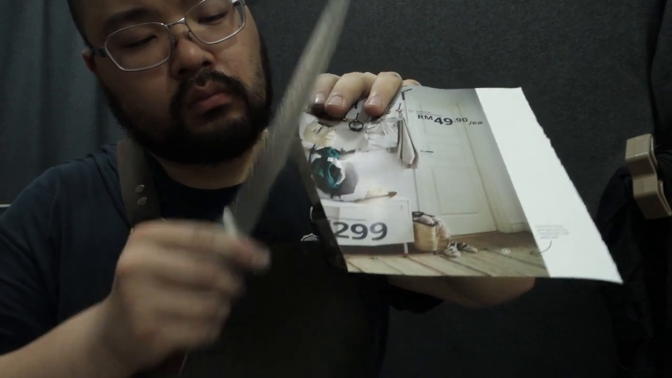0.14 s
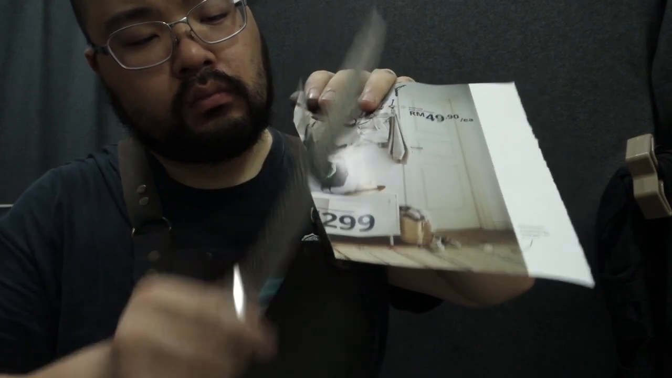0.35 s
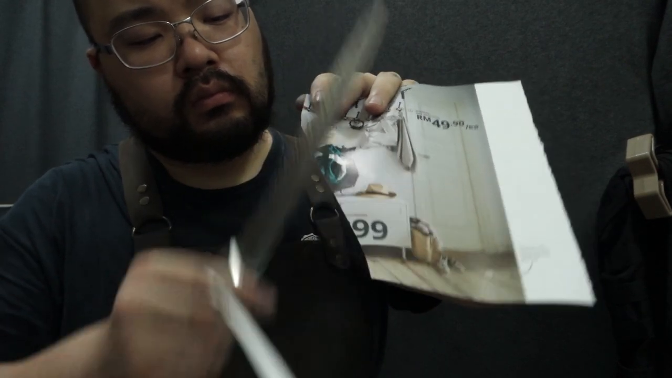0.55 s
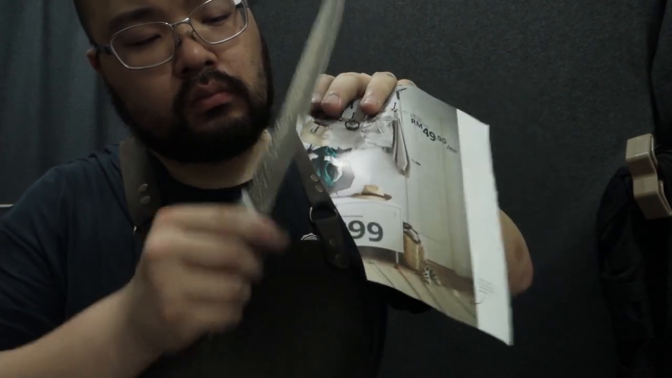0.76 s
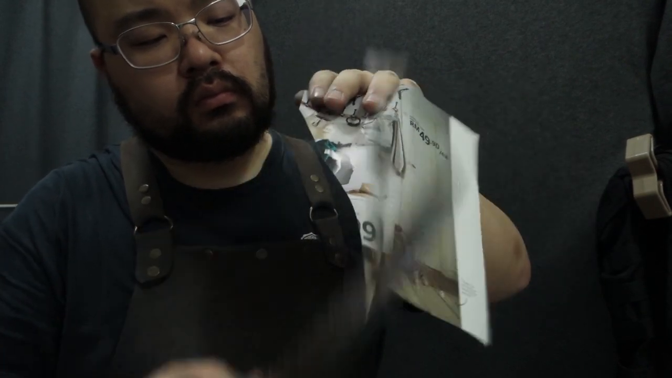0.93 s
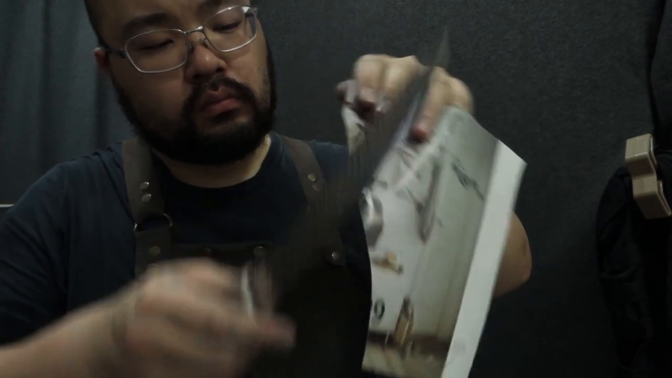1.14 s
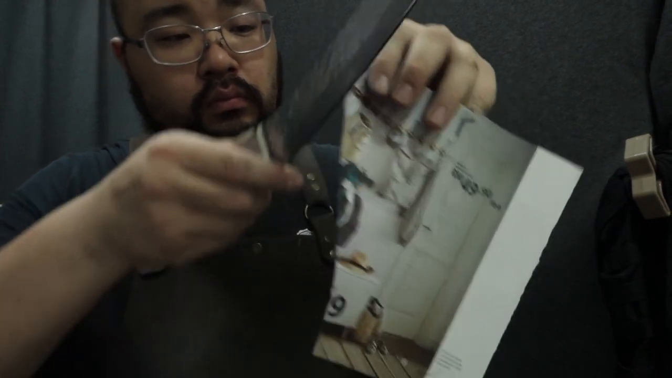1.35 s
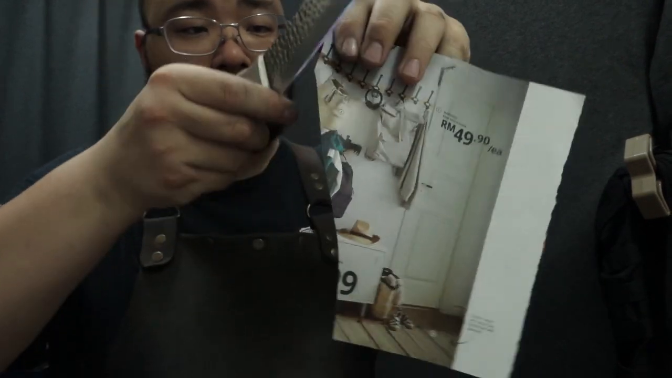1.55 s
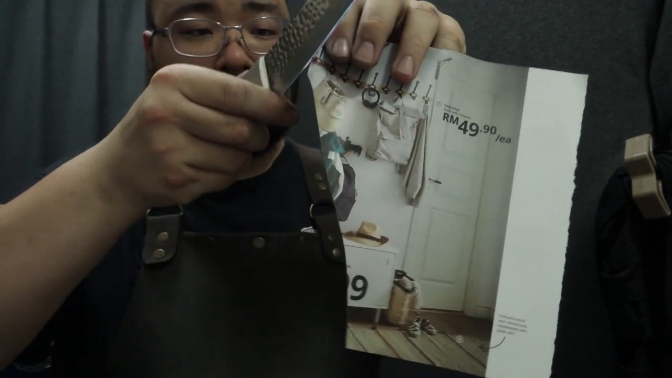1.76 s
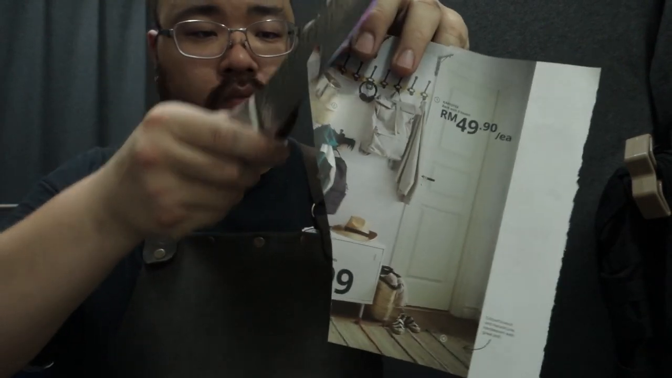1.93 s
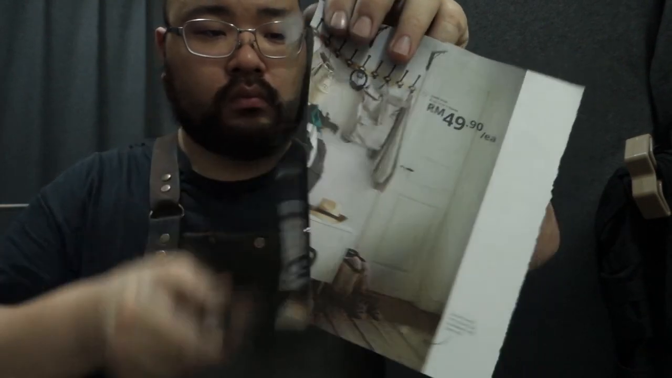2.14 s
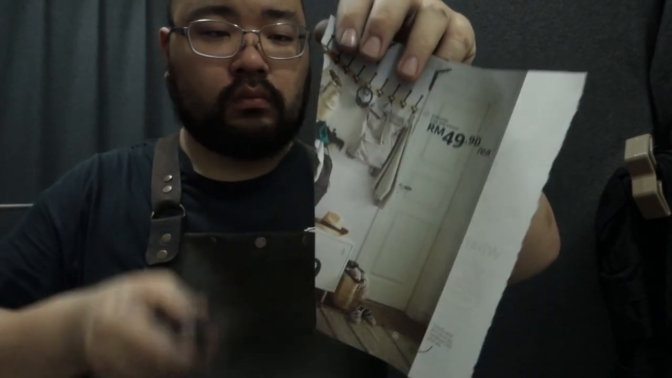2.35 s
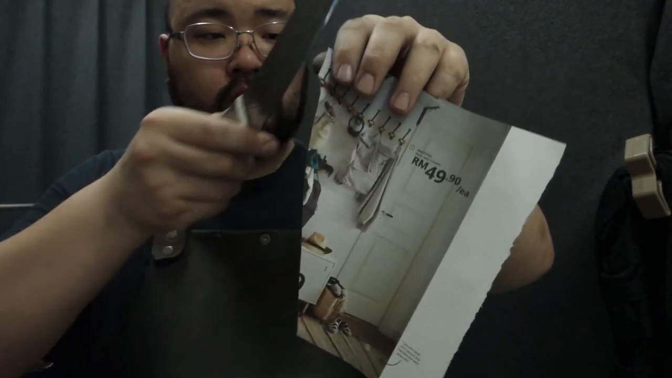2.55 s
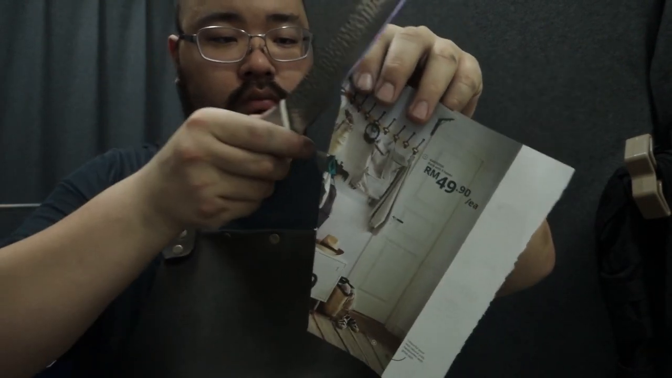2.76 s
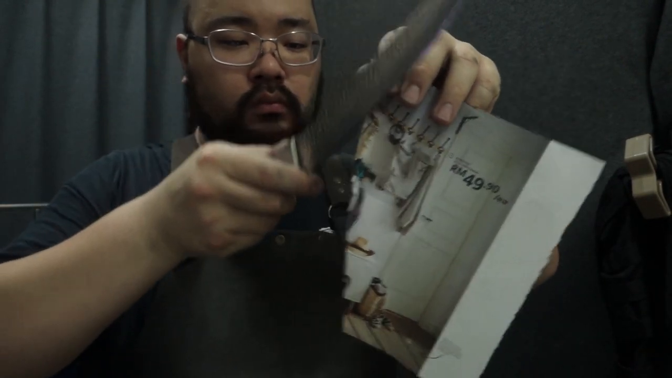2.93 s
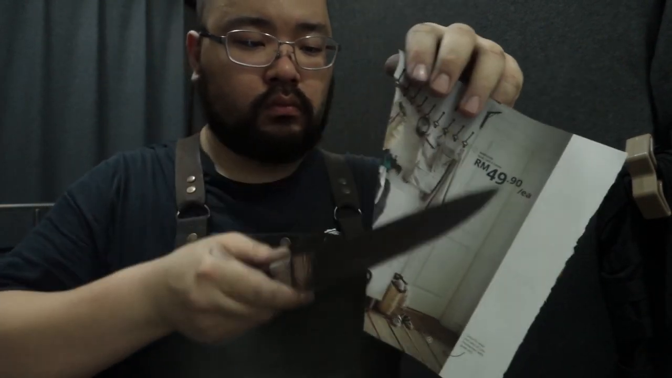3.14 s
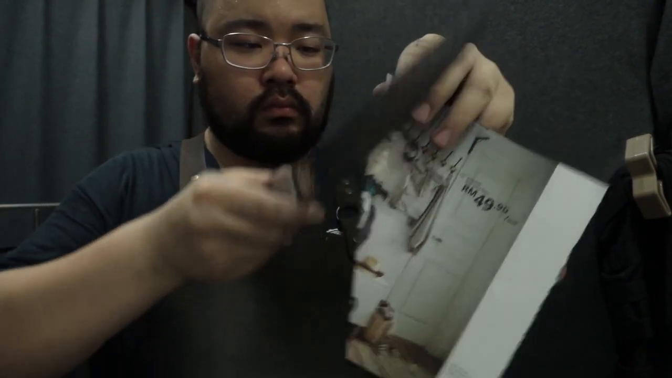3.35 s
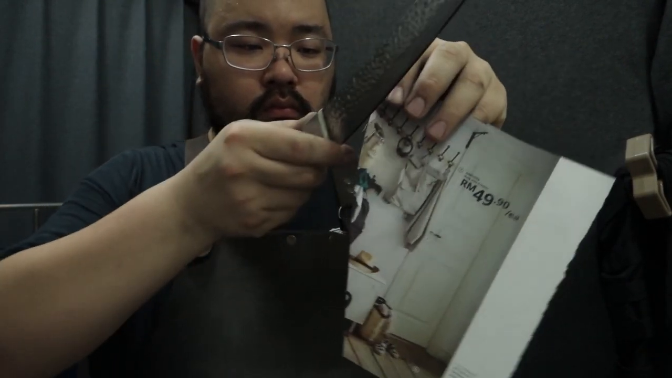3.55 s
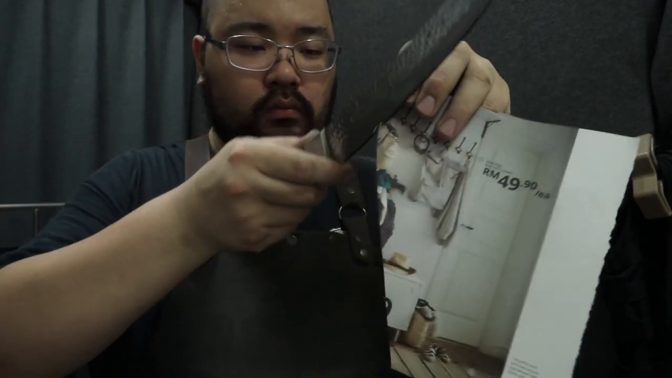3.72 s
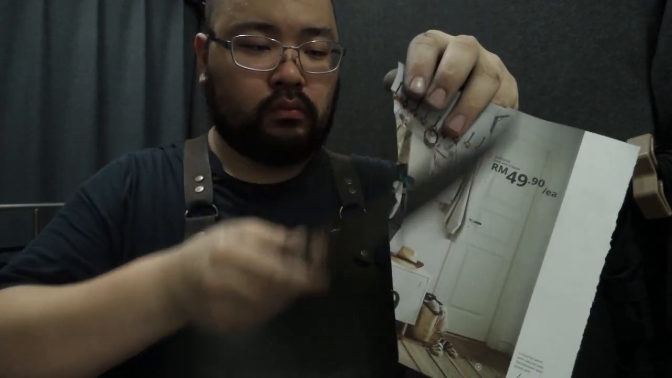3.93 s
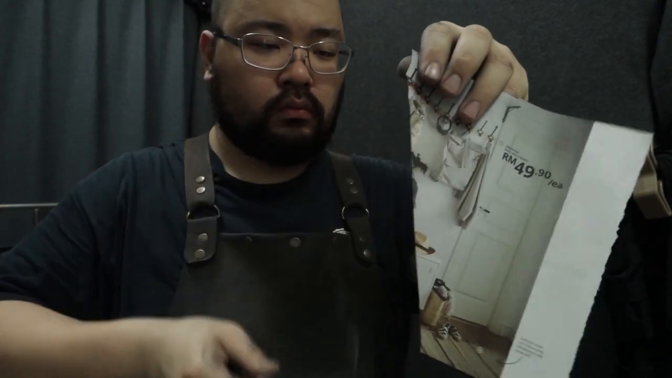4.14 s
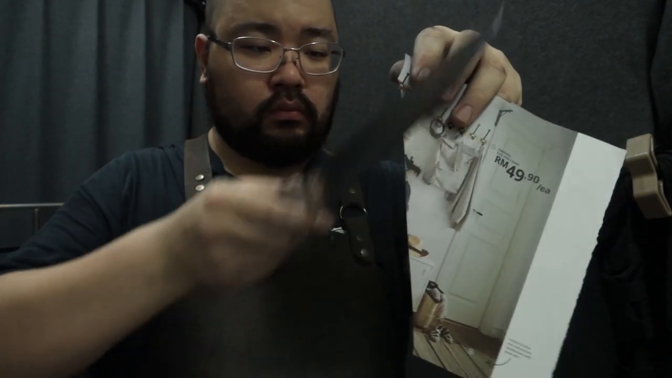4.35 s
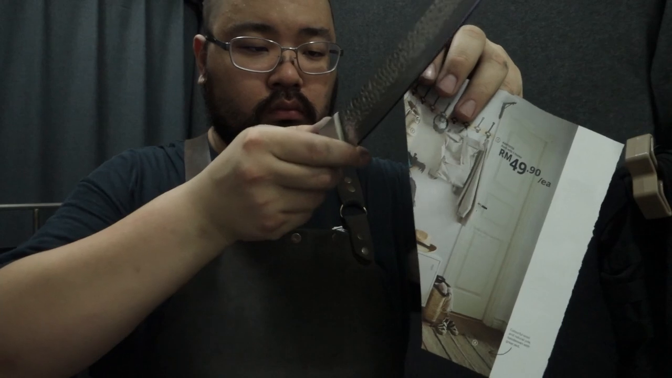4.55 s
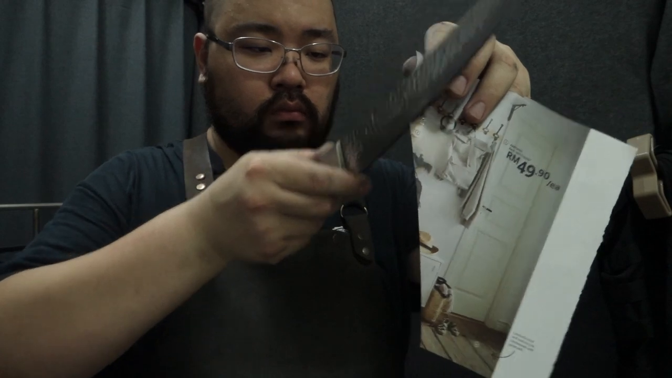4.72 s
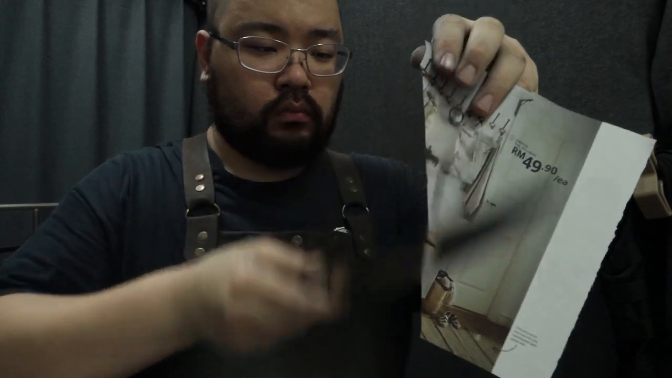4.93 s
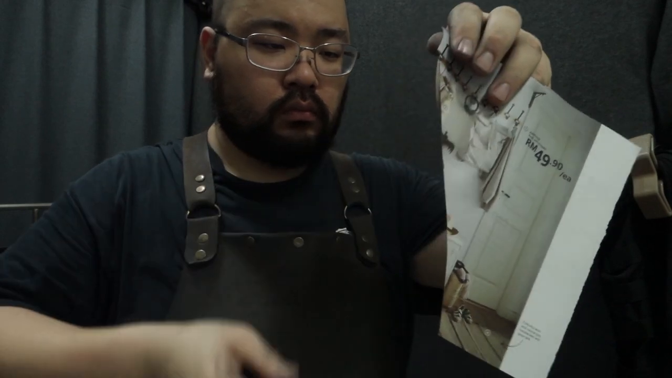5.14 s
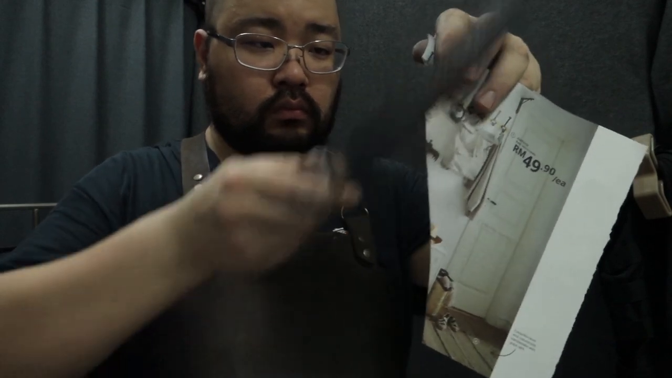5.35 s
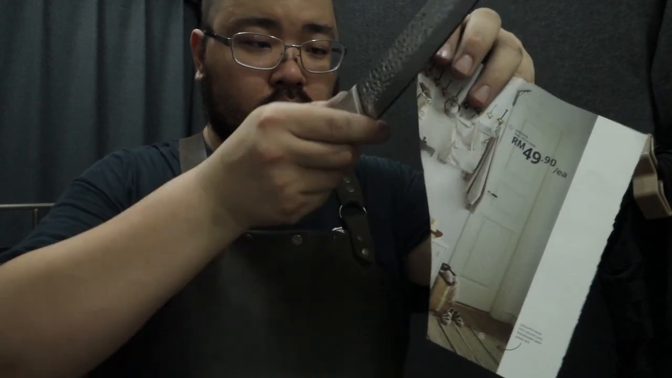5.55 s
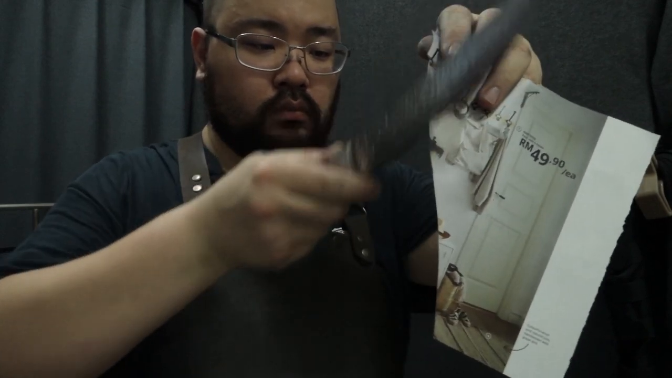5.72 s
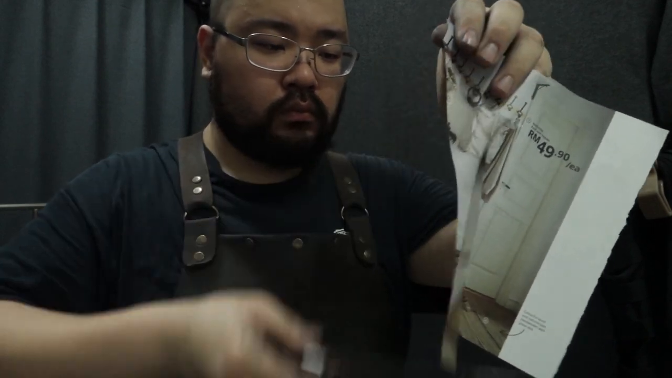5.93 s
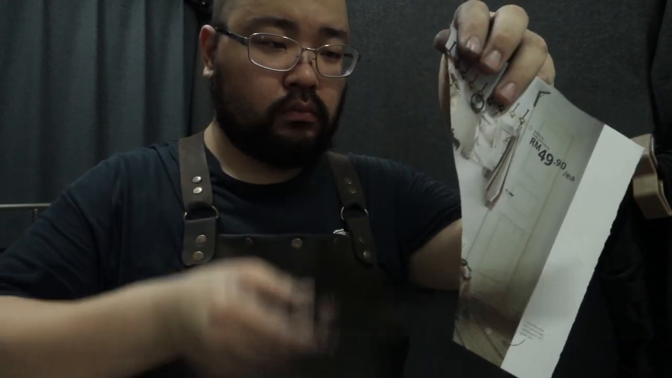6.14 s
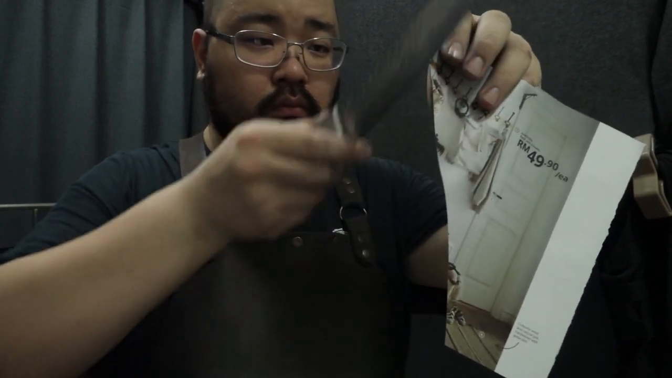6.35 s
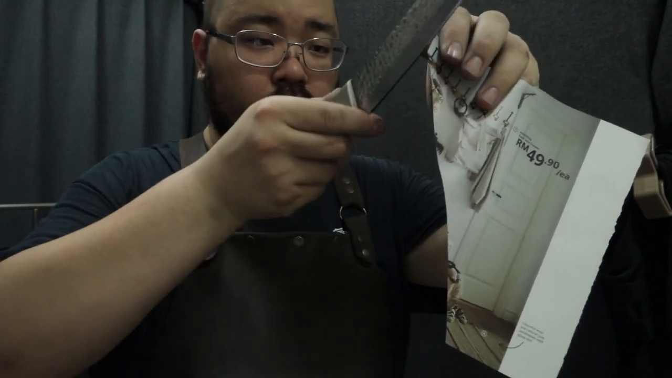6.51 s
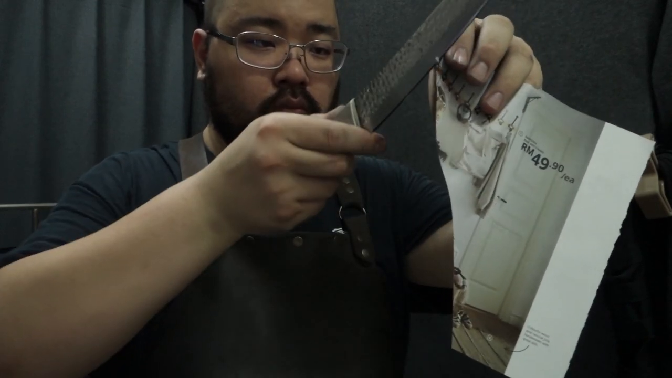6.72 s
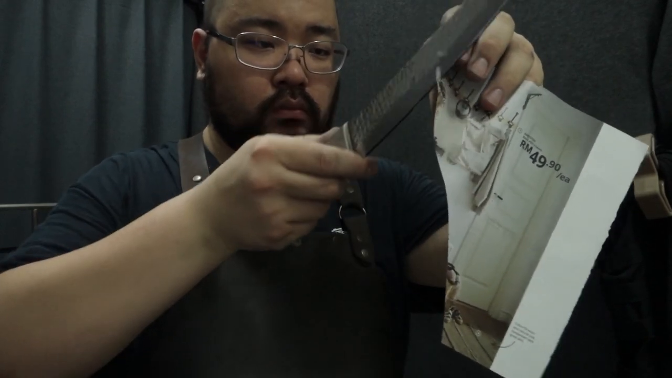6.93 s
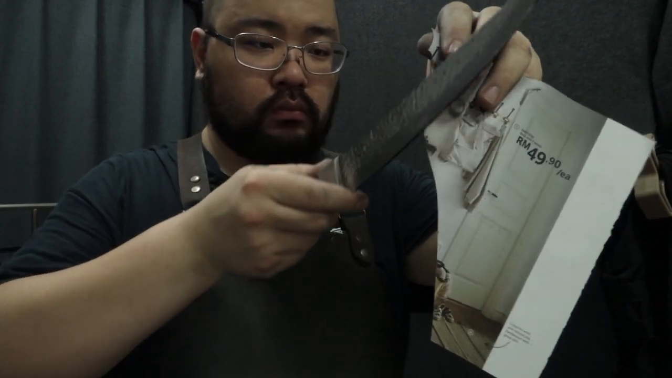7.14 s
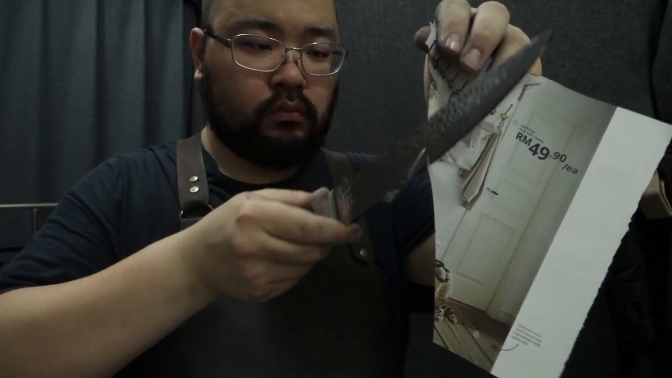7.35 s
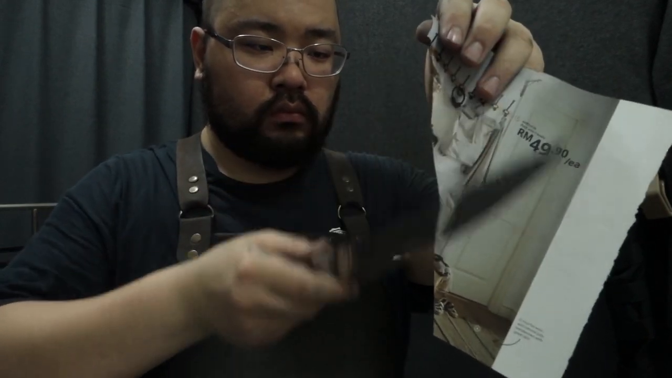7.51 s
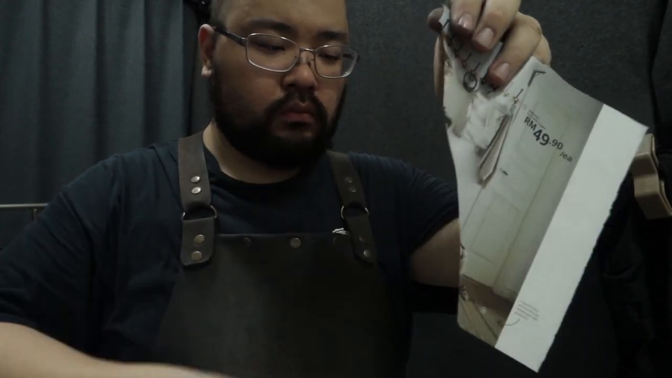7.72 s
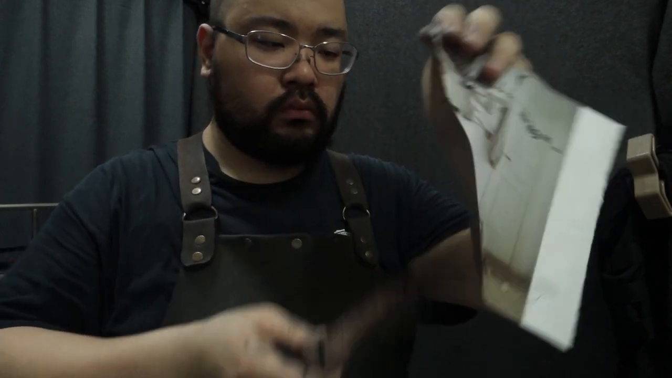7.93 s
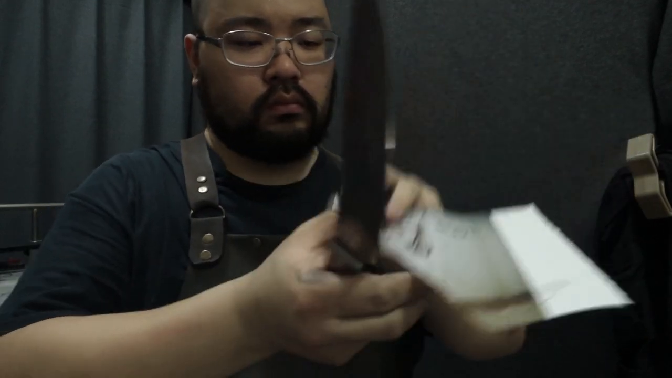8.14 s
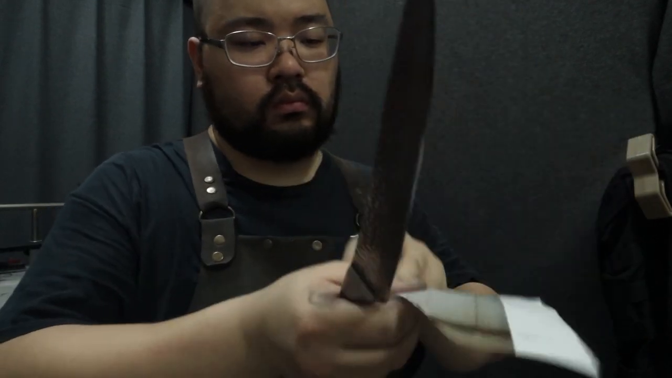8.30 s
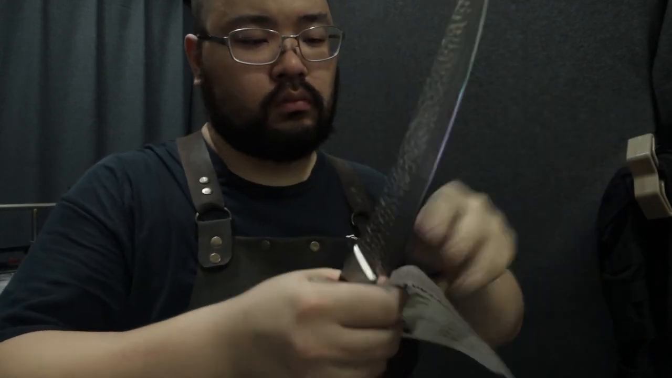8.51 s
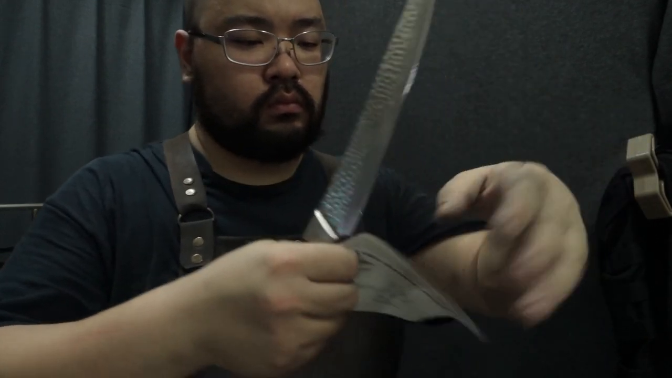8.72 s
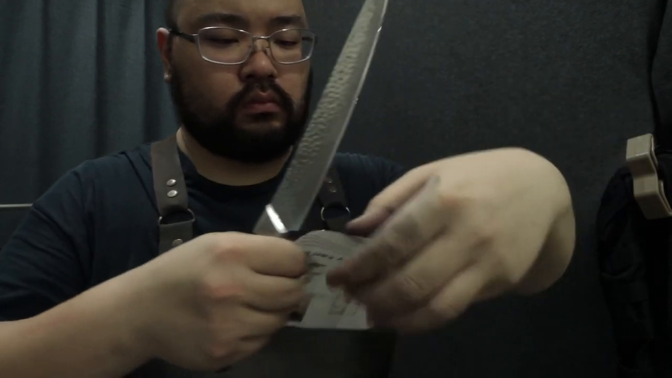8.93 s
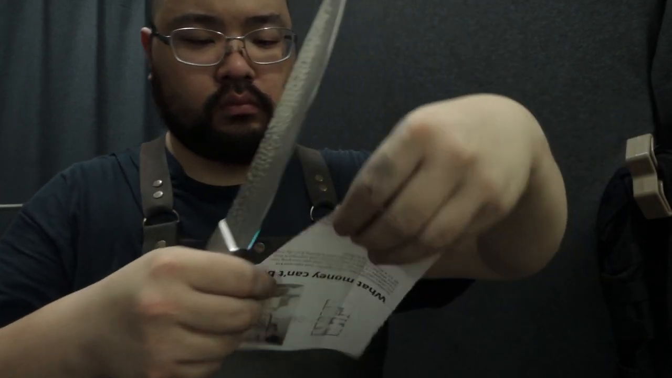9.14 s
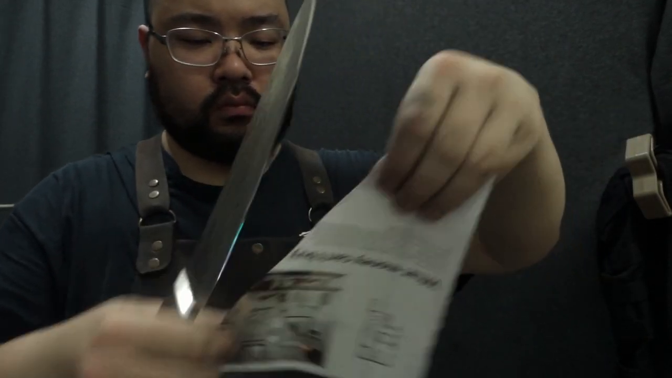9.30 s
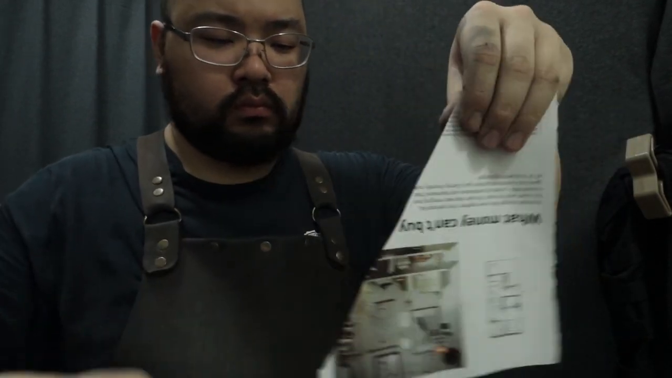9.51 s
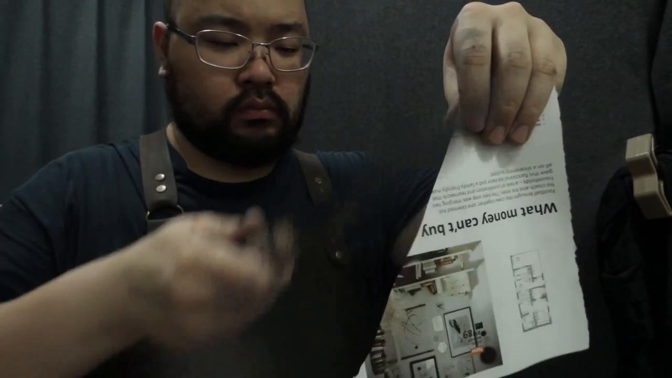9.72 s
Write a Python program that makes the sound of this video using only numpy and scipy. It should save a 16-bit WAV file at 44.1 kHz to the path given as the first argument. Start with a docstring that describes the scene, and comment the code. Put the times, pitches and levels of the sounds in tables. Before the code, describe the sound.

Fast paper cuts, each a dense papery rasp with a hissing edge and a little flick as the strip comes free. Between them the blade ticks and brushes the sheet. After a last slow, crackling then forceful slice come two soft taps, dull pops and quiet paper handling. Close, dry stereo pickup with short room reflections, steady low fan air and barely audible hum, highest treble missing.

```python
"""In a small curtained room with a fan and mains hum, a sharp knife is drawn again and again through glossy paper.
The hand-held sheet is close by: dense random clicks stand for snapping fibres, filtered into its dull ring and a hiss.
Single snaps and swells of the same clicks are the sheet bitten, brushed and flexed; at the end it is turned over.
Two soft taps are fading sine tones, and one faint whistle is a fluttering tone that glides.
Shaped noise makes the fan, a steady tone the hum, and sparse fading echoes the room."""
import sys
import numpy as np
from scipy import signal
from scipy.io import wavfile
from scipy.ndimage import uniform_filter1d

SR = 44100
rng = np.random.default_rng(int(sys.argv[2]) if len(sys.argv) > 2 else 0)


def generate_wav(sig):
    """Save sig (samples, or channels by samples) to the path in sys.argv[1] as 16-bit PCM at SR."""
    pcm = np.round(np.clip(np.atleast_2d(sig).T, -1, 1) * 32767).astype(np.int16)
    wavfile.write(sys.argv[1], SR, pcm)


N = 430857  # length in samples
HZ = np.fft.rfftfreq(256, 1 / SR)  # pitches of the short-time spectrum


def gain_of(db):
    """Turns decibels into a factor."""
    return 10 ** (np.asarray(db) / 20)


def evened(x):
    """Scales a signal to rms 1."""
    return x / np.sqrt(np.mean(x ** 2) + 1e-20)


def drift(size, count=N):
    """Slow random wandering: noise averaged twice over `size` steps, with rms 1."""
    noise = rng.standard_normal(count)
    return evened(uniform_filter1d(uniform_filter1d(noise, size=size), size=size))


def patches_of(dims, pitch_size, time_size):
    """Random patches of pitch and time with rms 1, from noise averaged along both axes."""
    across_pitch = uniform_filter1d(rng.standard_normal(dims), size=pitch_size, axis=-2)
    return evened(uniform_filter1d(across_pitch, size=time_size, axis=-1))


def read(points, hz):
    """Reads a curve made of straight lines on a log-frequency axis."""
    f, value = np.transpose(points)
    return np.interp(np.log(hz + 1), np.log(f + 1), value)


def shape(points, hz):
    """Gain of a spectrum, scaled so that white noise keeps its power when the curve is not shifted."""
    return gain_of(read(points, hz)) / np.sqrt(np.mean(gain_of(read(points, HZ)) ** 2))


def frames(x):
    """Splits a sound into short-time spectra and gives their times."""
    _, t, z = signal.stft(x, SR, nperseg=256, noverlap=192)
    return t, z


def unframed(z):
    """Turns short-time spectra back into sound."""
    return signal.istft(z, nperseg=256, noverlap=192)[1]


# Tone colour of the ringing sheet, also used for snaps: (pitch [Hz], relative level [dB])
SHEET_COLOUR = [(150, -74), (405, -16), (779, -9.5), (1450, -4.5), (1730, 0.5), (2920, -2.5), (3800, -10),
                (5200, -22), (6760, -19), (11400, -120)]
# Tone colour of the hiss at the blade, also used for snaps: (pitch [Hz], relative level [dB])
EDGE_COLOUR = [(2350, -57), (4000, -17.5), (4860, -13), (6330, -3.5), (8100, -1.5), (9840, 0), (11200, 2),
               (14600, -67)]
# The brightest band of the edge hiss wanders as the sheet bends and jumps up
# as the blade runs out: (time [s], pitch [Hz])
BRIGHT_PATH = [(.33, 8800), (.9, 9800), (1.8, 11100), (2.07, 6800), (2.15, 8900), (2.9, 6240), (3.17, 9200),
               (3.7, 6360), (3.96, 6250), (4.02, 9900), (4.72, 6800), (4.92, 7100), (5., 10000),
               (5.74, 7500), (5.85, 6600), (5.91, 11000), (6.85, 8800), (7.1, 8100), (7.3, 7400),
               (7.52, 8000), (7.61, 10000), (8.1, 10100)]
# The hanging strip bends away and hollows the sheet's tone once:
# (time [s], half length [s], pitch [Hz], half width [Hz], level change [dB])
HOLLOW = (7.265, .065, 2500, 550, -13)
BRIGHT_DB, BRIGHT_OCTAVES = 4.5, 0.18  # lift of the bright band over the rest, and its half width
TILT_DB = -7  # tilt of the hiss per octave, flat below 4 kHz
PATCHY_DB = 2.2  # rms unevenness of the sheet's sound
BODY_HZ = 1204  # the whole sheet flapping fills in below this


def cuts():
    """Grains at the blade ring the sheet, whose pitch slides with its free length, and hiss directly in the treble."""
    sheet, edge, pitch, body_db = strokes()
    # under light pressure the tearing breaks up into separate creases
    light = .5 / (1 + (sheet / gain_of(-41)) ** 2)
    dense = fibres(16000, 0.5, 1.2)
    creases = fibres(1800, 1.4, 3.5)
    grains = np.sqrt(1 - light) * dense + np.sqrt(light) * creases
    hiss = evened(0.25 * grains + fibres(20000, 0.4, 1.0))
    t, low = frames(sheet * grains)
    high = frames(edge * hiss)[1]
    sample_s = np.arange(N) / SR
    hz = HZ[:, None]

    # the pitch sways a little as the hand moves the sheet
    sway = 1 + .05 * drift(40, len(t))
    slide = np.clip(np.interp(t, sample_s, pitch) * sway, .5, 1.8)
    low = low * gain_of(np.interp(t, sample_s, body_db) / (1 + (hz / BODY_HZ) ** 4))
    hollow_s, half_s, hollow_hz, half_hz, hollow_db = HOLLOW
    hollow = np.exp(-((t - hollow_s) / half_s) ** 2 - ((hz - hollow_hz) / half_hz) ** 2)
    low = low * gain_of(hollow_db * hollow) * shape(SHEET_COLOUR, hz / slide)

    octaves_off = np.log2((hz + 1) / np.interp(t, *np.transpose(BRIGHT_PATH)))
    bright_db = BRIGHT_DB * (np.exp(-(octaves_off / BRIGHT_OCTAVES) ** 2) - .5)
    tilt_db = TILT_DB * np.log2(np.maximum(hz / 8000, .5))
    high = high * shape(EDGE_COLOUR, hz) * gain_of(tilt_db + bright_db)

    # the bending sheet sends out its sound unevenly
    patches = patches_of((len(HZ), len(t)), 4, 50)
    return ports((low + high) * gain_of(PATCHY_DB * patches), t)


def fibres(per_s, spread_db, clump_db):
    """Tearing fibres: random clicks, a few of them large, coming in clumps of some milliseconds."""
    size = gain_of(spread_db * np.minimum(rng.exponential(1, N), 4)) * rng.standard_normal(N)
    snapping = rng.random(N) < per_s / SR
    return evened(size * snapping * gain_of(clump_db * drift(220)))


# One row a cut: (sheet pitch factor at the bite, and at the exit, low body boost [dB], pressure curve);
# pressure curve from bite to exit: (time [s], sheet level [dB], edge hiss over the sheet [dB])
CUTS = [ (1.16, 1.03, -3, [(.262, -42, -14), (.275, -28.5, -7), (.31, -35, 8.5), (.34, -30, 4.5),
        (.428, -31.5, 4)]), (1.2, 1.26, -11, [(.77, -32, -6.5), (.82, -28, -1), (.86, -27.5, 4),
        (.948, -27, 3.5)]), (1.27, 1.13, -6.5, [(1.772, -51.5, 7), (1.85, -40.5, 0.5), (1.95, -28, -0.5),
        (2.04, -29, 3.5), (2.13, -29.5, 5.5), (2.172, -38, 12.5)]), (1.4, 0.87, 1, [(2.86, -58, 5),
        (2.88, -47, 5), (2.931, -39, 0.5), (2.937, -28.5, -5), (2.975, -32.5, -12)]),
        (0.66, 0.75, -8.5, [(3.148, -27.5, 1), (3.165, -28, -6), (3.183, -36, -5)]),
        (0.97, 1.015, -7.5, [(3.642, -49, -14), (3.71, -32.5, -15.5), (3.83, -23.5, -8), (3.98, -27.5, 0.5),
        (4.05, -36.5, 8.5)]), (1.44, 1.06, -0.5, [(4.699, -33.5, -9), (4.73, -37.5, -0.5),
        (4.77, -30.5, -6), (4.83, -36.5, 10), (4.91, -31, 8), (5.005, -30, 3.5)]),
        (1.11, 1.07, -2.5, [(5.568, -54, -6), (5.585, -43.5, -3), (5.62, -41.5, -1.5), (5.68, -39.5, 3),
        (5.72, -28, 2), (5.76, -34.5, 10), (5.85, -32, 6), (5.89, -29, 3), (5.94, -32.5, 7.5)]),
        (1.07, 1.024, -8.5, [(6.678, -54, 3), (6.74, -46, -4), (6.78, -51, 0), (6.96, -36, 0),
        (6.982, -29.5, 1), (7.1, -33, 7.5), (7.17, -35, 7.5), (7.21, -29, -4.5), (7.35, -29.5, -6),
        (7.43, -33.5, 1), (7.475, -21, -7), (7.56, -22, -6.5), (7.645, -28.5, 3.5)]), ]
# The sheet brushed or flexed: (start [s], swell [s], fade by 60 dB [s], top level [dB],
# hiss over the sheet [dB], pitch factor, low body boost [dB])
RUSTLES = [(.001, 0.0011, 0.35, -60, 1, 1.7, 21), (1.432, 0.016, 0.18, -50.5, 1, 0.95, 6),
           (2.264, 0.0027, 0.09, -30.5, -32, 0.54, -10), (2.763, .006, 2.1, -60, 0.5, 1, -1),
           (3.034, 0.042, 0.15, -37.5, -18, 0.92, 5), (4.088, 0.0023, 0.085, -34, -37, 0.79, 1.5),
           (4.609, 0.051, 0.21, -43, -1, 1.04, 4), (5.532, 0.0079, 0.079, -47.5, -3.5, 1.17, 13),
           (8.04, 0.19, 1.3, -84.5, 30.5, 0.87, 6), (8.18, 0.0022, 0.14, -36.5, -37, 0.92, 7),
           (8.252, 0.0024, 1.1, -47, -24, 0.99, 6), (8.349, 0.0012, 0.2, -34.5, -17, 1.3, 8),
           (8.39, 0.084, 0.28, -60, 8.5, 1.7, 17), (8.838, 0.007, 0.31, -51, -30, 0.73, 3),
           (9.145, 0.023, 0.16, -46, -16, 0.87, 7.5), (9.198, 0.0057, 2, -47.5, -13, 1.08, 0),
           (9.326, 0.057, 0.055, -46.5, -3.5, 1.1, 14)]
BITE_S = 0.0012  # the blade enters at once
EXIT_T60_S, EXIT_PITCH = 0.049, 1.4  # when it leaves, the strip flicks off higher: fade [s], pitch factor
SWELL_FROM_DB = -12.5  # where a rustle starts, below its top


def strokes():
    """Pressure sets the sheet level and edge hiss; where strokes overlap, the louder weighs more on pitch and body."""
    t = np.arange(N) / SR
    sheet, edge, pitch, body = np.zeros((4, N))
    shapes = []
    for first, last, low_db, rows in CUTS:
        shapes.append((first, last, EXIT_PITCH, EXIT_T60_S, low_db, *np.transpose(rows)))
    for s, swell, t60, db, hiss_db, factor, low_db in RUSTLES:
        times, levels = np.array([s, s + swell]), [db + SWELL_FROM_DB, db]
        shapes.append((factor, factor, 1, t60, low_db, times, levels, [hiss_db] * 2))

    for first, last, flick, t60, low_db, s, db, hiss_db in shapes:
        on = slice(round(s[0] * SR), round((s[-1] + t60) * SR))
        u = t[on]
        fade_db = 60 * np.maximum(u - s[-1], 0) / t60
        power = gain_of(2 * (np.interp(u, s, db) - fade_db))
        power *= np.clip((u - s[0]) / BITE_S, 0, 1) ** 2
        sliding = np.interp(u, s[[0, -1]], [first, last])
        sheet[on] += power
        edge[on] += power * gain_of(2 * np.interp(u, s, hiss_db))
        pitch[on] += power * np.where(u < s[-1], sliding, last * flick)
        body[on] += power * low_db
    total = sheet + 1e-12
    return np.sqrt(sheet), np.sqrt(edge), (pitch + 1e-12) / total, body / total


# Single snaps as the blade bites or the fingers flex the sheet:
# (time [s], relative level [dB], treble over body [dB], pitch factor)
SNAPS = [(1.07, -45, 6, 1), (1.2352, -42, 1, .8), (1.75, -31, -20, .7), (1.7744, -28, 1, 1),
         (3.131, -22, -8, 1), (2.264, -24, -25, .6), (2.975, -17, -16, .9), (3.6187, -17, -15, .7),
         (3.685, -17, -26, .6), (5.522, -30, -19, .8), (5.6163, -14, -10, 1), (6.7804, -31, -3, 1.05),
         (6.791, -23, -11, .9), (6.838, -28, -1, 1), (6.9765, -18, -5, 1.3), (8.349, -25, -1, .9),
         (8.9347, -35, -30, .7), (9.238, -31, -20, 1)]


def snaps():
    """Each snap is a sharp click with a few milliseconds of crackle, given the sheet and edge colours."""
    low, high = np.zeros((2, N))
    t = np.arange(400) / SR
    crackle = 0.3 * rng.standard_normal((len(SNAPS), len(t))) * gain_of(-60 * t / 0.009)
    crackle[:, 0] = 1.6  # the click itself
    for (s, db, treble_db, _), burst in zip(SNAPS, crackle):
        at = round(s * SR)
        low[at:at + len(t)] += gain_of(db) * burst
        high[at:at + len(t)] += gain_of(db + treble_db) * burst
    frame_s, body = frames(low)
    treble = frames(high)[1]
    # each moment takes the pitch of the nearest snap
    snap_s, _, _, pitch = np.transpose(SNAPS)
    nearest = np.abs(frame_s[:, None] - snap_s).argmin(axis=1)
    slide = np.clip(pitch, .2, 2)[nearest]
    body = body * shape(SHEET_COLOUR, HZ[:, None] / slide) ** 0.85  # slightly softened colour
    return ports(body + treble * shape(EDGE_COLOUR, HZ)[:, None], frame_s)


# Soft low taps: (time [s], relative level [dB], pitch [Hz])
TAPS = [(8.031, -36, 640), (8.121, -38, 650)]
TAP_T60_S = 0.023  # time to fade by 60 dB


def taps():
    """A soft tap is a short low tone that starts quickly and dies away."""
    out, t = np.zeros(N), np.arange(N) / SR
    for s, db, hz in TAPS:
        u = np.maximum(t - s, 0)
        swell = np.minimum(u / 0.0022, 1)
        out += gain_of(db - 60 * u / TAP_T60_S) * swell * np.sin(2 * np.pi * hz * u)
    return out


# The gliding pitch of the faint whistle: (time [s], pitch [Hz])
WHISTLE_PATH = [(4.16, 8200), (4.26, 10600), (4.34, 10100), (4.45, 10800), (4.52, 10100), (4.63, 9900)]
WHISTLE_DB = -72  # relative level


def whistle():
    """A thin tone glides along its path, swelling and sinking, with a random flutter in its strength."""
    t = np.arange(N) / SR
    s, hz = np.transpose(WHISTLE_PATH)
    flutter = evened(uniform_filter1d(rng.standard_normal(N), size=400))
    progress = np.clip((t - s[0]) / (s[-1] - s[0]), 0, 1)
    swell = np.sqrt(np.sin(np.pi * progress) + 1e-12)
    tone = np.sin(2 * np.pi * np.cumsum(np.interp(t, s, hz)) / SR)
    return gain_of(WHISTLE_DB) * swell * flutter * tone


# The sheet leans to the right, further in the middle, and ends as it began:
# (time [s], treble left over right [dB])
LEAN = [(.6, -4), (4.9, -7), (7.3, -7.5), (9.3, -4)]
# How much of that lean is felt at each pitch: (pitch [Hz], share)
SHADOW = [(300, 0.19), (2000, 0.15), (5000, 1.14), (7500, 0.91), (11000, 1.38)]


def ports(z, t):
    """The housing of the two microphones shades and phase-shifts the far side, most in the treble."""
    lean_db = np.interp(t, *np.transpose(LEAN)) * read(SHADOW, HZ)[:, None]
    left = gain_of(lean_db / 2) * np.exp(1j * 0.17 * lean_db)
    right = gain_of(-lean_db / 2)
    # sound bent round the housing arrives with a wandering phase
    bent = left * np.exp(1j * 0.12 * lean_db * patches_of(z.shape, 3, 12))
    # scaled so that both sides added, before the wandering, keep the level
    pair = np.array([bent, right]) * 2 / np.abs(left + right)
    return unframed(z * pair)[:, :N]


# The moving band that the housing weakens: (time [s], pitch [Hz])
DIP_PATH = [(5., 4740), (6.9, 6100), (7.05, 4870), (7.3, 5300), (7.5, 4300), (8.15, 5550), (8.33, 4000),
            (9.3, 4400)]


def housing(x):
    """The housing lifts one band of close sound and weakens another, which moves as the sheet turns."""
    t, z = frames(x)
    hz = HZ[:, None]
    dip_hz = np.interp(t, *np.transpose(DIP_PATH))
    lift_db = 3.0 * np.exp(-((hz - 2700) / 500) ** 2)
    dip_db = -6.5 * np.exp(-((hz - dip_hz) / 600) ** 2)
    return unframed(z * gain_of(lift_db + dip_db))[:, :N]


# How long the room echoes last: (pitch [Hz], time to fade by 60 dB [s])
ROOM_FADE = [(300, 0.68), (2000, 0.36), (10000, 0.24)]


def room(x):
    """Sparse echoes of random sign fade at a speed set by pitch.

    Three random tails take turns in a steady cycle, which keeps the echo from ringing at fixed pitches."""
    out = np.zeros((2, N))
    turn = 2 * np.pi * 1.7 * np.arange(N) / SR
    for k in range(3):
        echoes = np.zeros((2, 20000))
        at = np.arange(120, 19980, 20) + rng.integers(0, 20, (2, 993))
        np.put_along_axis(echoes, at, rng.choice([-1., 1.], at.shape), 1)
        echoes[1] = 0.55 * echoes[0] + 0.79 * echoes[1]  # the two sides are partly alike
        t, z = frames(echoes)
        tail = unframed(z * gain_of(-60 * t / read(ROOM_FADE, HZ)[:, None]))
        tail = tail / np.linalg.norm(tail, axis=1, keepdims=True)
        share = np.sqrt(2 / 3) * np.cos(turn + k * np.pi / 3)  # the three powers add up to one
        out += signal.fftconvolve(x * share, tail, axes=1)[:, :N]
    return out


# Tone colour of the fan's air noise: (pitch [Hz], relative level [dB])
FAN_COLOUR = [(30, -52), (114, -29), (188, -10.5), (574, -2.5), (683, 3.5), (990, -3.5), (1710, -1.5),
              (1930, -6), (2140, -2), (3340, -17), (6500, -21.5), (11200, -19.5), (14600, -59)]
# How alike left and right are: (pitch [Hz], likeness from 0 to 1)
FAN_SAME = [(60, 0.63), (340, 0.99), (1910, 0.57), (10800, 0.019)]
# Balance of the two sides: (pitch [Hz], left over right [dB])
FAN_LEAN = [(60, 2.5), (10800, -4.5)]
FAN_DB = -54  # rms level of the air noise, left and right averaged


def fan():
    """Steady air noise: random spectra with faint patches, shared in part by left and right."""
    count, hz = N // 256 + 5, np.fft.rfftfreq(1024, 1 / SR)
    a, b, c, d = rng.standard_normal((4, len(hz), count))
    left, other = a + 1j * b, c + 1j * d
    same = np.clip(read(FAN_SAME, hz), -1, 1)[:, None]
    z = np.array([left, same * left + np.sqrt(1 - same ** 2) * other])
    half_lean_db = read(FAN_LEAN, hz)[:, None] / 2
    patches_db = patches_of((len(hz), count), 10, 14)
    z *= gain_of(read(FAN_COLOUR, hz)[:, None] + patches_db + np.array([half_lean_db, -half_lean_db]))
    air = signal.istft(z, nperseg=1024, noverlap=768)[1][:, :N]
    return gain_of(FAN_DB) * air / np.sqrt(np.mean(air.mean(0) ** 2))


HUM_HZ, HUM_DB = 200.1, -77.5  # pitch, and rms level around which it wavers


def hum():
    """The mains hum is one low tone whose level wavers slightly."""
    level = gain_of(HUM_DB + 0.5 * drift(4000))
    return np.sqrt(2) * level * np.sin(2 * np.pi * HUM_HZ * np.arange(N) / SR)


def scene():
    """The paper and small sounds, heard close and through the room, over the fan and hum."""
    near = cuts() + snaps() + taps() + whistle()
    return gain_of(0.09) * housing(near) + gain_of(-8.0) * room(near) + fan() + hum()


CUTOFF_HZ = 11030


def record(dry):
    """A steep low-pass filter removes the treble above the cutoff."""
    low_pass = signal.firwin(3001, CUTOFF_HZ, window=("kaiser", 7), fs=SR)
    return signal.oaconvolve(dry, low_pass[None], "same")


dry = scene()
out = record(dry)
generate_wav(out)
```